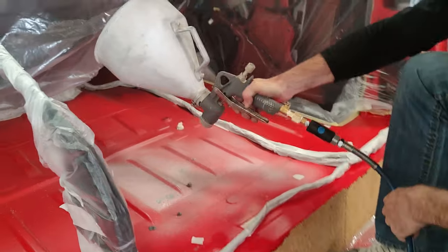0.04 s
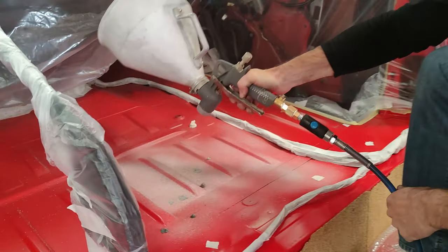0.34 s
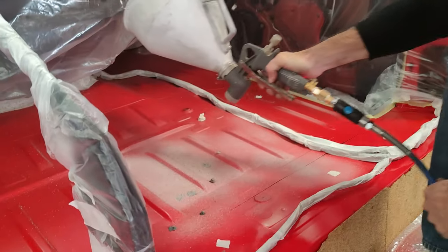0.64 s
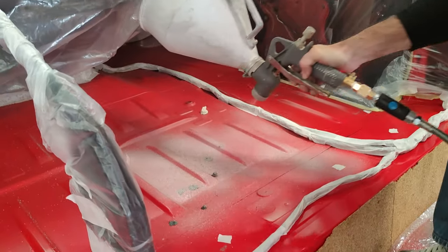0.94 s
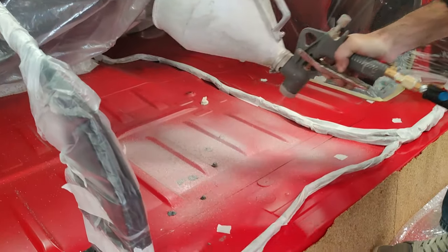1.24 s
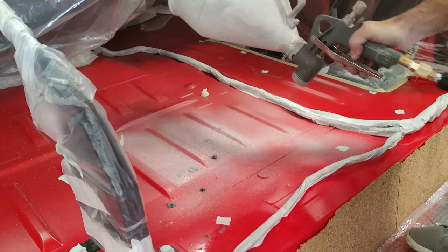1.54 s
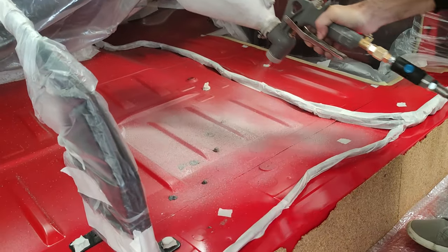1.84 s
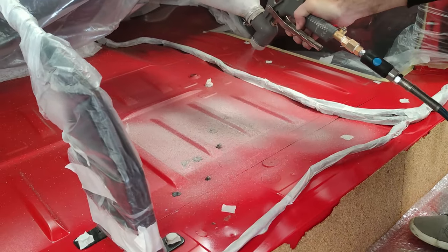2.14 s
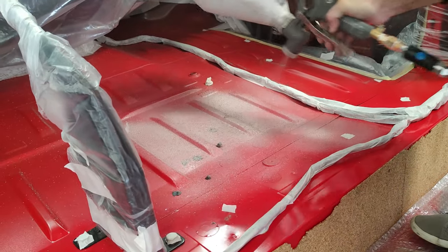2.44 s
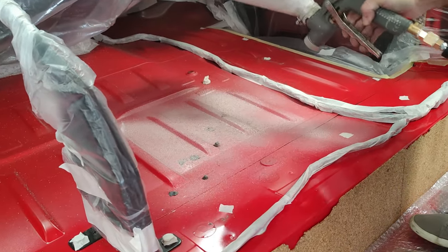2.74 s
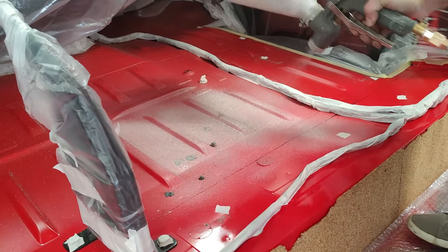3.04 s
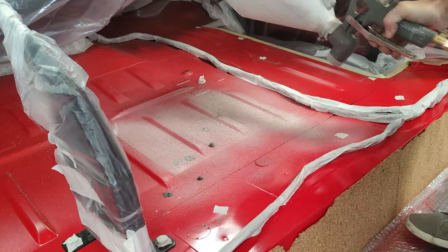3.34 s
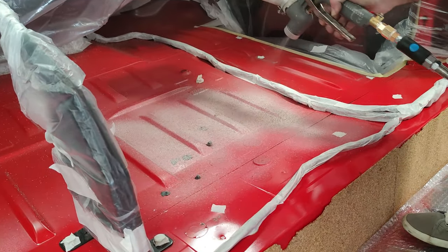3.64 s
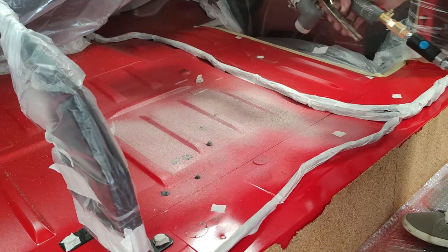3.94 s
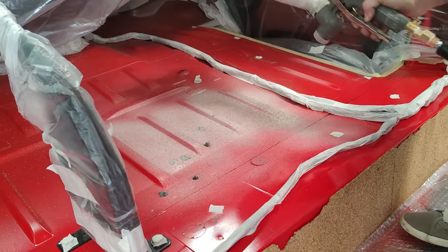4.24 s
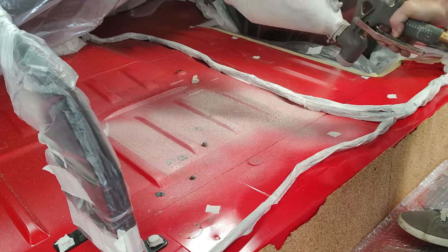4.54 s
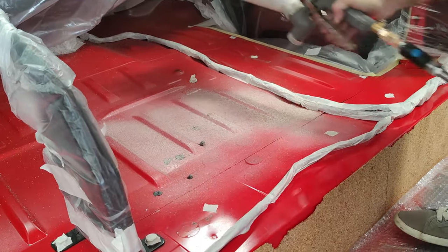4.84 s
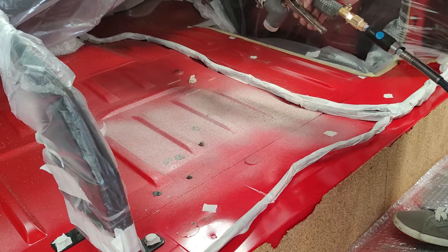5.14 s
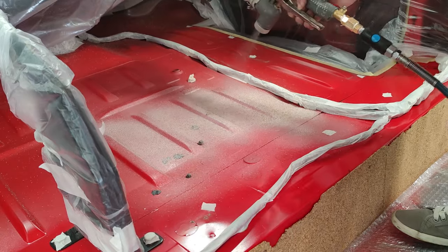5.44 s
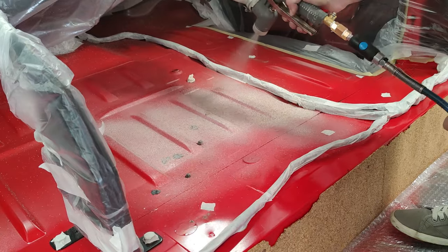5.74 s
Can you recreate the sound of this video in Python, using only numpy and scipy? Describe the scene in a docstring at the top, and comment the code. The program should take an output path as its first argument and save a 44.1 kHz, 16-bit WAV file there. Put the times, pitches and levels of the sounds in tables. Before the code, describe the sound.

Close up inside an empty car shell, an air spray gun hisses without a break, laying down thick coating. Short chokes and small surges roughen the flow, and passing whistly edges and a slight swirl follow the sweeping nozzle. The sound starts bright over the open metal floor, then turns hollower and fuller as it strikes a corner several times. Stray air lightly buffets the left side of the microphone.

```python
"""A bright, unbroken hiss: a compressed-air hopper gun sprays thick coating on a car body's bare floor.
The turbulent jet radiates broadband noise and sputters as lumps of coating pass the nozzle. Echoes off
the panels interfere with it and shift as the gun sweeps. The jet excites resonances, first over the
open floor, then in a hollow corner that rings and booms. Spent air flutters by on the left."""
import sys
import numpy as np
from scipy import signal
from scipy.fft import rfft, irfft
from scipy.io import wavfile
from scipy.ndimage import uniform_filter1d

SR = 44100
rng = np.random.default_rng(int(sys.argv[2]) if len(sys.argv) > 2 else 0)


def waveform_to_disk(signal):
    """Save audio, clipped to [-1, 1], as 16-bit WAV at the path in sys.argv[1]."""
    frames = np.transpose(np.atleast_2d(signal))
    scaled = np.clip(frames, -1, 1) * 32767
    samples = np.round(scaled).astype(np.int16)
    wavfile.write(sys.argv[1], SR, samples)


N = 254971
FRAME, HOP = 2048, 512
TIME = np.arange(N) / SR
FRAME_TIME = np.arange(N // HOP + 5) * HOP / SR
BIN_HZ = np.fft.rfftfreq(FRAME, 1 / SR)


# spectrum of the jet on each side: (frequency [Hz], relative spectral level [dB])
JET_SPECTRUM_LEFT = [(100, -24), (700, -17), (2100, -14.5), (2600, -11), (4000, -10.5), (5000, -7.5),
                     (6100, -11), (6900, -2.5), (7500, 0.9), (9000, 1.36), (10500, -1.5), (11300, -5),
                     (13000, -1), (15700, -5.5)]
JET_SPECTRUM_RIGHT = [(70, -29.5), (700, -20.5), (1400, -19), (2200, -12), (3500, -7.5), (3950, -4),
                      (4900, -0.8), (6500, 0), (7450, -12.5), (8050, -39), (9100, -11), (10700, -8),
                      (13200, -7), (15300, -12.5)]
def jet_hiss(flow_db, side_db=(-28, -29), correlation=0.2, lead_s=.00016, lead_s_per_m=0.001):
    """Turbulent mixing radiates broadband noise, which reaches each side by its own echoes."""
    # the left hears the jet first, less so as the gun moves right
    delay = np.exp(-2j * np.pi * BIN_HZ[:, None] * (lead_s - lead_s_per_m * nozzle_position()))
    left = turbulence()
    right = correlation * left * delay + np.sqrt(1 - correlation ** 2) * turbulence()
    spectra, hollow_shares = [JET_SPECTRUM_LEFT, JET_SPECTRUM_RIGHT], [.45, .85]
    sides = []
    for noise, spectrum, share, peaks_db in zip([left, right], spectra, hollow_shares, whistles_db()):
        colour_db = over_bins(spectrum) + brightness_db() + share * hollowness_db()
        colour_db += peaks_db + 1.06 * patches(size=(50, 3))
        sides.append(waveform(noise * gain_of(colour_db) * panel_echoes()))
    return gain_of(side_db)[:, None] * np.array(sides) * gain_of(flow_db)


# lumps choke the nozzle: (time [s], nominal width [s], left level [dB], right level [dB])
LUMP_CHOKES = [(0.68, 0.034, -2.5, -2), (1.33, .06, -0.5, 3), (1.767, .04, -3, 0), (2.053, .018, -3, -2.5),
               (2.285, 0.012, -6.5, -4.5), (2.52, 0.013, -7, -5.5), (2.905, .007, -4.5, -2),
               (3.11, .014, -6, -3), (3.243, .02, -6, -3.2), (3.476, .009, -10, -6),
               (3.51, .013, -3.5, -11), (3.648, 0.0058, -9, -1.5), (3.775, 0.027, -8, -1),
               (4.46, .025, -0.5, -4), (4.678, 0.015, -4.5, -4), (4.78, .02, 0.5, -2.5),
               (4.934, 0.029, -4.5, -2), (5.277, 0.012, -8, -2.5), (5.425, 0.021, -1.5, -5)]
def jet_flow_db(steady_db=-.1, closing=1.07, clearing=0.38):
    """Amplitude modulation by the flow: each lump throttles the jet slowly and clears fast."""
    wander_db = np.outer([1, -.5], .6 * wobble(rate_hz=9))  # between left and right
    level_db = steady_db + surges(TIME)[0] + wander_db
    for time, width, left_db, right_db in LUMP_CHOKES:
        choke = bell(TIME, time, width * np.where(TIME < time, closing, clearing))
        level_db += np.outer([left_db, right_db], choke)
    # the coating tears into drops: shared flutter and spatter, then each side's own flutter
    level_db += 0.57 * wobble(rate_hz=55) + 0.73 * wobble(rate_hz=460)
    return level_db + 0.48 * np.array([wobble(rate_hz=58), wobble(rate_hz=40)])


# the nozzle runs clear: (time [s], nominal width [s], level [dB], hollowness on hitting metal [dB])
JET_SURGES = [(0.03, .025, 1.5, 4), (0.24, .05, 1.2, 4), (0.43, 0.033, 1.6, -1), (0.75, .05, 1.2, 1.5),
              (0.975, 0.025, 3, -3), (1.162, .008, 2, -2), (1.212, .012, 1.8, -3), (1.6, .04, 2, 0.5),
              (1.99, 0.013, 3, -2), (2.24, 0.098, 1, -1.5), (2.95, .07, 1.8, -1), (3.13, 0.029, 3.3, 1.5),
              (3.27, .035, .9, 4), (3.41, .025, 1.6, 0), (3.54, 0.047, 3.4, 0), (3.68, 0.015, 2, 1.5),
              (4.202, .007, 4, 4), (4.233, .008, 3.5, 8), (4.34, .027, 2.5, -1), (4.525, .027, 3.8, -3),
              (4.836, .022, 3, 1), (5.3, .014, 1.8, 1), (5.48, 0.014, 2.5, -2), (5.75, .022, 4, 2)]
def surges(t, rise=.5, sag=1.45):
    """Jet noise grows with flow: a surge adds level and shifts hollowness (dB), rising fast, sagging slowly."""
    return sum(np.outer([level_db, hollow_db], bell(t, time, width * np.where(t < time, rise, sag)))
               for time, width, level_db, hollow_db in JET_SURGES)


# tilt of the gun: (time [s], brightness [dB])
GUN_TILT = [(0, 2), (.25, 0.5), (.6, -4), (1.0, -1), (1.3, -.8), (1.65, -0.7), (2.4, -1), (2.55, 6.5),
            (3.05, 2.5), (3.7, 0), (3.9, 4.5), (4.4, 4.5), (4.64, -2), (4.95, 7), (5.25, 4.8), (5.78, 5.5)]
# how far each frequency follows the brightness: (frequency [Hz], share [dB/dB])
BRIGHTNESS_SHARES = [(1000, -0.24), (5000, -0.24), (7500, -0.15), (10500, 0.15), (15000, 0.44)]
def brightness_db(surge_darkening=.4):
    """Directivity: the treble of the jet depends on its aim, and surges darken it."""
    bright_db = over_time(GUN_TILT, FRAME_TIME) - surge_darkening * surges(FRAME_TIME)[0]
    return over_bins(BRIGHTNESS_SHARES) * bright_db


# how far each frequency follows the hollowness: (frequency [Hz], share [dB/dB])
HOLLOWNESS_SHARES = [(80, 0.61), (400, 1), (1000, 0.36), (2200, 0.81), (3200, 0.55), (4500, 0.037)]
def hollowness_db(away_db=-3, corner_db=5.3, floor_db=2.4):
    """Impingement: a jet striking the corner or the floor gains lows and mids."""
    hollow_db = away_db + surges(FRAME_TIME)[1] + corner_db * corner_drive(FRAME_TIME)[0]
    hollow_db += floor_db * gain_of(floor_drive_db(FRAME_TIME))
    return over_bins(HOLLOWNESS_SHARES) * hollow_db


# peaks in the hiss: (time [s], width [s], frequency [Hz], width [Hz], left gain [dB], right gain [dB])
WHISTLE_PEAKS = [(.58, 0.49, 6550, 130, 6, -0.5), (2.198, 0.18, 8100, 450, 2.5, 6),
                 (2.62, 0.18, 6270, 130, 0, 5), (2.802, 0.31, 10200, 380, 4.5, 3),
                 (4.38, 0.041, 5100, 130, 7, 8.5), (4.8, 0.16, 5520, 170, 3, 4),
                 (5.688, 0.097, 5660, 130, -3, 2)]
def whistles_db():
    """Narrowband emphasis gives noise a pitch: passing peaks lend the hiss a whistly edge."""
    peaks_db = np.zeros((2, len(BIN_HZ), len(FRAME_TIME)))
    for time, width_s, hz, width_hz, left_db, right_db in WHISTLE_PEAKS:
        peak = np.outer(bell(BIN_HZ, hz, width_hz), bell(FRAME_TIME, time, width_s))
        peaks_db += np.multiply.outer([left_db, right_db], peak)
    return peaks_db


# sweep of the hand: (time [s], nozzle position [m])
HAND_SWEEP = [(0, -.16), (.5, -0.11), (1.0, -0.062), (1.5, 0.055), (1.9, -0.027), (2.25, -0.041),
              (2.7, 0.068), (3.25, 0.14), (3.8, 0.046), (4.1, 0.06), (4.5, 0.14), (5.0, 0.022),
              (5.4, 0.0042), (5.78, -0.047)]
def nozzle_position():
    """Source motion: the nozzle's position in each frame sets the lengths of the sound paths."""
    return over_time(HAND_SWEEP, FRAME_TIME)


def panel_echoes(total_db=-3.5, count=18, nearest_m=0.2996, spread_m=5.0, sway_m=0.026, sound_m_per_s=343):
    """Comb filtering: delayed reflections interfere, and the notches move as the gun sweeps and sways."""
    position = nozzle_position()
    comb = np.ones((len(BIN_HZ), len(FRAME_TIME)), complex)
    for distance, bearing, phase, pace in rng.random((count, 4)):
        across, along = np.cos(2 * np.pi * bearing), np.sin(2 * np.pi * bearing)
        sway = sway_m * np.sin(2 * np.pi * ((0.2517 + 0.4 * pace) * FRAME_TIME + phase))
        path_m = nearest_m + spread_m * distance ** 2 + across * position + along * sway
        cycles = phase - BIN_HZ[:, None] * path_m / sound_m_per_s
        comb += gain_of(total_db) / np.sqrt(count) * np.exp(2j * np.pi * cycles)
    return comb


# air modes of the hollow body: (frequency [Hz], bandwidth [Hz], relative level [dB])
UPPER_MODES = [(636, 70, -3.5), (760, 41, -2.5), (957, 46, 3.5), (1198, 47, 1.5), (1680, 125, 1.5),
               (1826, 45, 0), (2140, 83, -8), (2676, 23, -11)]
DEEP_MODES = [(343.5, 20, 0), (384, 55, -10.5)]
def corner_ring(away_db=(-19, -15)):
    """Cavity resonance: the enclosed air rings and booms, only faintly while the jet points away."""
    upper_db, deep_db = 20 * np.log10(corner_drive(TIME) + gain_of(away_db)[:, None])
    ring = resonate(UPPER_MODES, upper_db, side_db=(-55.5, -50.5))
    boom = resonate(DEEP_MODES, deep_db, side_db=(-63.5, -63.5))
    return ring + boom


# the jet crosses the corner: (start [s], end [s], upper mode drive [dB], deep mode drive [dB])
CORNER_PASSES = [(3.11, 3.473, -3, -2.5), (3.526, 3.73, -4, -2), (4.172, 4.91, 0.5, 0), (5.19, 5.26, -3, 4),
                 (5.36, 5.72, -5, 1)]
def corner_drive(t, attack_s=.02, release_s=.04):
    """Build-up and decay: on each pass the upper and deep mode amplitudes rise, hold and die away."""
    drive = np.zeros((2, len(t)))
    for start, end, upper_db, deep_db in CORNER_PASSES:
        envelope = np.clip(np.minimum((t - start) / attack_s, (end - t) / release_s) + .5, 0, 1)
        drive += np.outer(gain_of([upper_db, deep_db]), envelope)
    # ready to be weighted: row 0 upper, row 1 deep
    return drive


# broad resonances over the open floor: (frequency [Hz], bandwidth [Hz], relative level [dB])
FLOOR_MODES = [(733, 100, 3.5), (1900, 100, 2), (2584, 190, 8.5)]
def floor_ring(share_db=-3.3):
    """Damped resonance: broad peaks colour the sound while the jet lands on the open floor."""
    drive_db = share_db + floor_drive_db(TIME) + surges(TIME)[0]
    return resonate(FLOOR_MODES, drive_db, side_db=(-52.5, -49.5))


def floor_drive_db(t, leaves_s=2.43, fade_db_per_s=7.5):
    """Exponential fade: the floor takes the whole jet at first, then less as the gun moves off it."""
    return -fade_db_per_s * np.maximum(t - leaves_s, 0)


def resonate(modes, drive_db, side_db, correlation=0.79):
    """Forced vibration: jet noise, partly alike on both sides, drives a sum of damped modes."""
    hz = np.fft.rfftfreq(N, 1 / SR)
    noise = np.sqrt(correlation) * rng.standard_normal(N)
    noise = noise + np.sqrt(1 - correlation) * rng.standard_normal((2, N))
    # neighbouring modes swing in opposite senses
    response = sum((-1) ** k * gain_of(db) / (1 + 2j * (hz - centre) / bandwidth)
                   for k, (centre, bandwidth, db) in enumerate(modes))
    return gain_of(side_db)[:, None] * irfft(rfft(noise * gain_of(drive_db)) * evened(response), N)


# spent air sweeping over the floor: (time [s], level [dB])
DRAFT_LEVELS = [(0, 0), (.5, 0.3), (1.3, -2.5), (1.7, -1), (2.2, -5), (2.75, 2.5), (3.2, -1.5), (3.85, 1.5),
                (4.7, -1.5), (5.0, -2), (5.45, 4), (5.78, 1)]
# its rush: (frequency [Hz], relative spectral level [dB])
DRAFT_SPECTRUM = [(20, -20), (70, 1), (200, 0.5), (600, -1), (1500, -2), (3000, -5.5), (6000, -8)]
def spent_air(side_db=(-44, -65.5), swell_db=.8, gust_db=1.8):
    """Convected turbulence: quick eddies carry pressure fluctuations, uncorrelated on the two sides."""
    draft_db = over_time(DRAFT_LEVELS, TIME) + swell_db * wobble(rate_hz=14)
    sides = []
    for level_db in side_db:
        rush = waveform(turbulence() * gain_of(over_bins(DRAFT_SPECTRUM) + 2.0 * patches(size=(4, 3))))
        sides.append(rush * gain_of(level_db + draft_db + gust_db * wobble(rate_hz=80)))
    return np.array(sides)


# the strongest eddies: (time [s], relative level [dB], weight of the deep part [dB])
EDDY_STRIKES = [(0.084, 6.5, 16), (0.463, 9.5, -4), (2.522, 8, 14), (2.541, 8.5, 1.6), (2.625, 6.5, -7),
                (3.473, 6, -2), (3.675, 5, -1), (3.924, 8, 2), (3.984, 6, 1), (4.168, 5, -2),
                (5.061, 6, -5), (5.123, 6, -5), (5.356, 6, 0)]
def eddy_puffs(level_db=-43.5, width_s=0.0054, deep_hz=380, deep_db=-11, right_db=-18):
    """Dynamic pressure: eddies strike the left side as short puffs, some of them deep."""
    rush, eddy = (waveform(turbulence() * gain_of(over_bins(DRAFT_SPECTRUM))) for _ in range(2))
    rumble = gain_of(deep_db) * signal.sosfilt(signal.butter(2, deep_hz, fs=SR, output="sos"), eddy)
    left = np.zeros(N)
    for time, strike_db, weight_db in EDDY_STRIKES:
        puff = rush * bell(TIME, time, width_s)
        thump = gain_of(weight_db) * rumble * bell(TIME, time, 2 * width_s)
        left += gain_of(strike_db) * (puff + thump)
    return gain_of(level_db) * np.array([left, gain_of(right_db) * left])


def turbulence():
    """Gaussian white noise as short-time spectra, bins x frames."""
    real, imaginary = rng.standard_normal((2, len(FRAME_TIME), len(BIN_HZ)))
    return (real + 1j * imaginary).T


def patches(size):
    """Moving averages smooth noise into blotches of unit rms, size = (bins, frames)."""
    return evened(uniform_filter1d(uniform_filter1d(turbulence().real, size[0], 0), size[1], 1))


def wobble(rate_hz):
    """Low-pass noise: a random fluctuation of unit rms, up to about the given rate."""
    hz = np.fft.rfftfreq(N, 1 / SR)
    return evened(irfft(rfft(rng.standard_normal(N)) / (1 + (hz / rate_hz) ** 2), N))


def waveform(spectra):
    """Overlap-add turns short-time spectra into a waveform of unit rms."""
    return evened(signal.istft(spectra, nperseg=FRAME, noverlap=FRAME - HOP)[1][:N])


def over_bins(curve):
    """Interpolation over log frequency, as a column of bins."""
    hz, value = np.transpose(curve)
    return np.interp(np.log(BIN_HZ + 1), np.log(hz + 1), value)[:, None]


def over_time(curve, t):
    """Linear interpolation at the times t."""
    return np.interp(t, *np.transpose(curve))


def bell(x, centre, width):
    """A Gaussian of height one; the width is its standard deviation."""
    return np.exp(-.5 * ((x - centre) / width) ** 2)


def gain_of(db):
    """Decibels to amplitude."""
    return 10 ** (np.asarray(db) / 20)


def evened(x):
    """Normalisation to unit rms."""
    return x / np.sqrt(np.mean(abs(x) ** 2) + 1e-20)


def scene():
    """Superposition of the jet, the resonances it excites and the spent air."""
    return jet_hiss(jet_flow_db()) + corner_ring() + floor_ring() + spent_air() + eddy_puffs()


def record(dry):
    """Band limiting: a linear-phase low-pass removes the highest treble."""
    low_pass = signal.firwin(801, cutoff=15830, window=("kaiser", 8), fs=SR)
    return signal.oaconvolve(dry, low_pass[None], "same")


dry = scene()
out = record(dry)
waveform_to_disk(out)
```